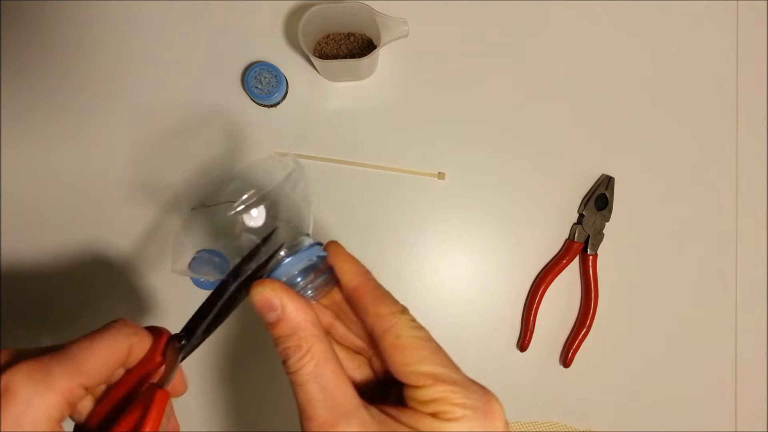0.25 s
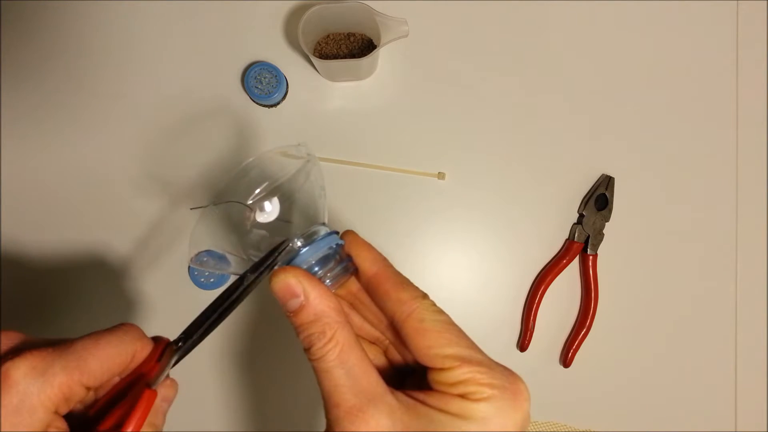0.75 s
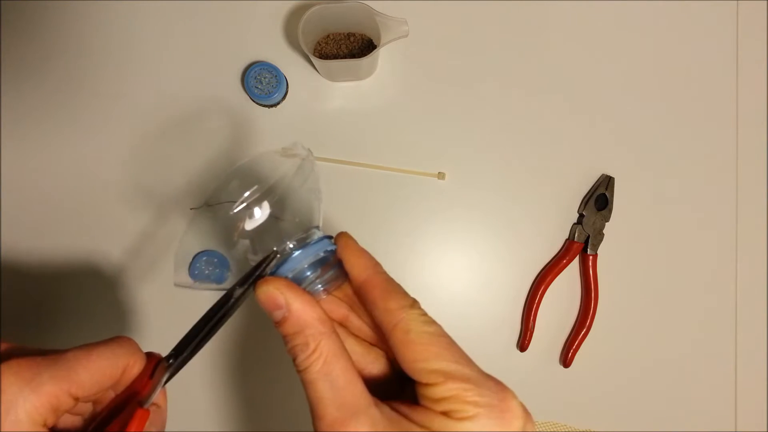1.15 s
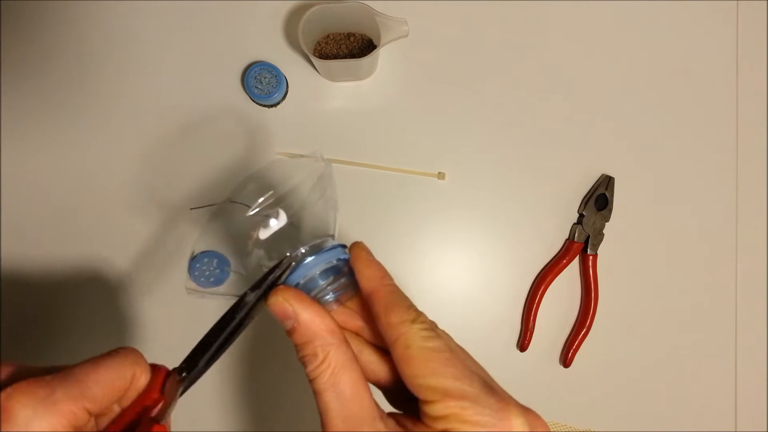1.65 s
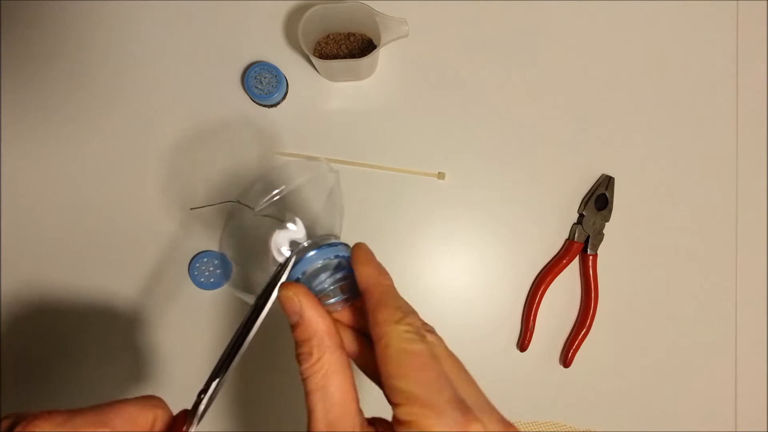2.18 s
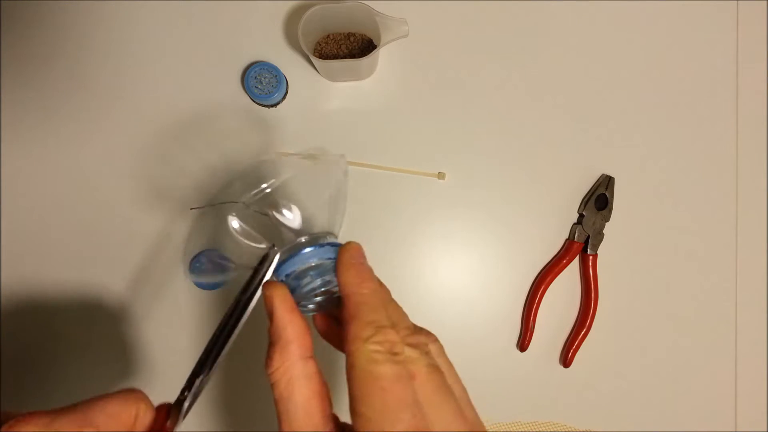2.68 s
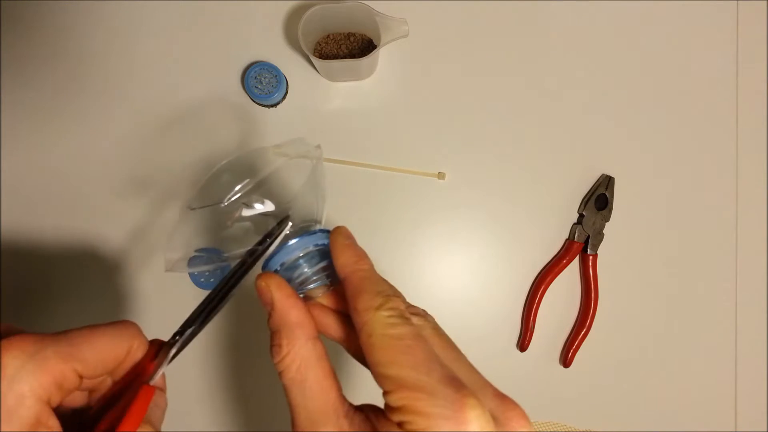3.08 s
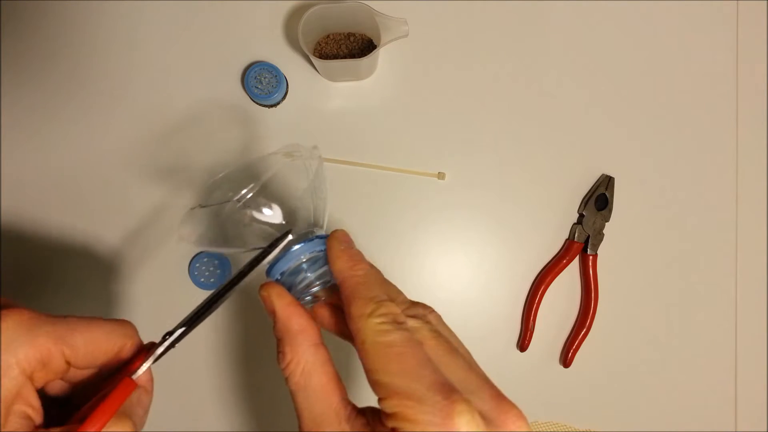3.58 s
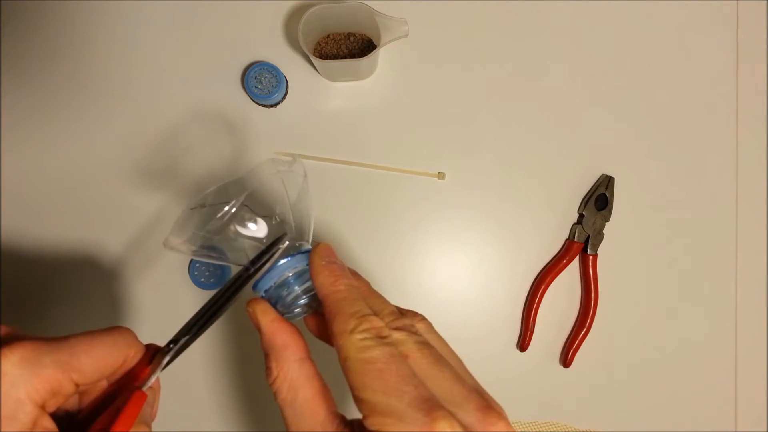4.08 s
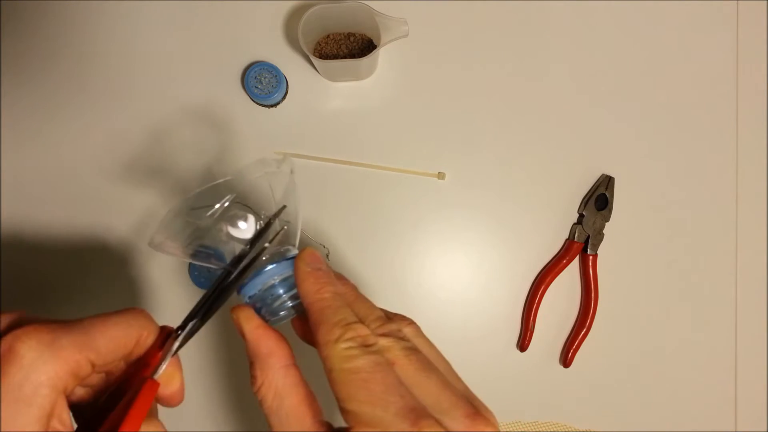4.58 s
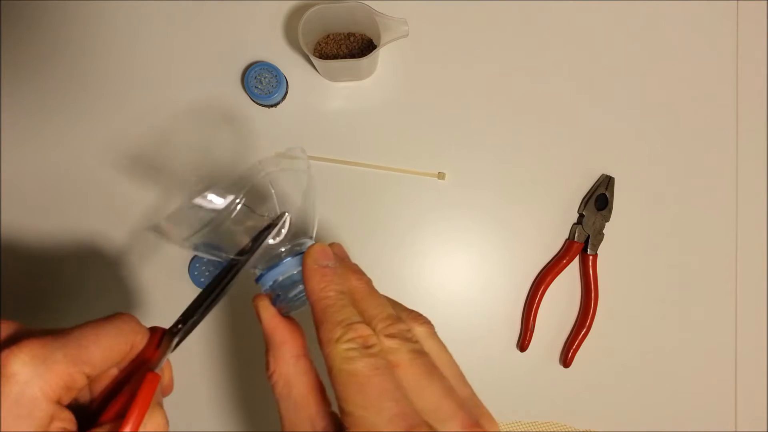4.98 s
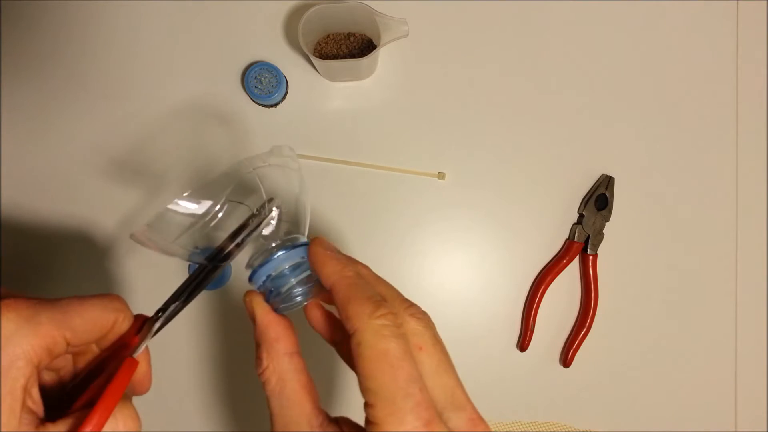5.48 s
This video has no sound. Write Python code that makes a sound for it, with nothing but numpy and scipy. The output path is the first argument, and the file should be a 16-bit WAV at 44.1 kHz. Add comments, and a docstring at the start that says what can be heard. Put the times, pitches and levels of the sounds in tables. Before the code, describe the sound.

Thin, stiff plastic snaps and crackles as blades shear it, picked up by a close stereo pair in a small reflective room. The cutting is uneven: scattered clicks, low hollow knocks from the bottle shell, brief dry rubs and gaps of near silence. The strongest crack comes just before three seconds; a busy burst follows at five, and a crisp snap ends it. Low room noise stays underneath.

```python
"""A small hard-walled room, where scissors cut a thin plastic bottle held over a table.
The wall buckles and cracks in short snaps; the blades shear and rub through it in dense crackle.
Snaps, crackle and a few dull knocks all drive the same set of ringing modes, the bottle's shell.
A pair of microphones above also hears the room's echoes, a distant rumble and a faint hiss."""
import sys
import numpy as np
from scipy import signal
from scipy.fft import rfft
from scipy.io import wavfile

SR = 44100
rng = np.random.default_rng(int(sys.argv[2]) if len(sys.argv) > 2 else 0)


def digitize_waveform(pressure):
    """Quantize a signal to 16-bit integers and store it at the path in sys.argv[1].

    Rows of a 2-D input are taken as channels; values are limited to [-1, 1].
    """
    field = np.atleast_2d(pressure).T
    bounded = np.clip(field, -1, 1)
    quanta = np.round(bounded * 32767).astype(np.int16)
    wavfile.write(sys.argv[1], SR, quanta)


N = 253263   # length of the scene in samples

# Levels in the tables are relative: they add up with each other and with the settings further down.
# Cracks of the wall: start_s, level_db (at the crest pitch), fall_db (loss per octave below the crest),
# treble_db (change towards the treble), pitch_hz (favoured mode), left_right_db (held within 5 either way),
# t60_s (time for the rattle to fade by 60 dB)
SNAPS = [(0.0617, -38, 6, -2.5, 2190, 2.5, 0.015), (0.2603, -26, 6, -16, 3520, -1, 0.02),
         (0.3, -40, 1, -7, 1080, 0, 0.0077), (0.3989, -42, 0.5, -23, 1570, 2, 0.0075),
         (0.4669, -51, 3, -17, 1030, 4, .01), (0.5876, -47.5, -0.5, -23, 3980, 0, 0.018),
         (0.6384, -60.5, 0, -10, 740, 4, .008), (0.7731, -32, 9.5, -21, 4410, -1, 0.015),
         (0.804, -41.5, 3, 0, 4900, 4, 0.034), (0.8112, -37, 5, -13, 3200, -2, 0.013),
         (0.8457, -16, 1.5, -13, 1038, -0.5, 0.026), (1.0065, -20.5, 7, -15, 2163, .5, 0.01),
         (1.202, -44, 12, -5, 4220, 6, 0.013), (1.2112, -37, 9, -4.5, 2740, 2, 0.032),
         (1.2184, -44.5, 7, -2, 2730, -1, 0.011), (1.2575, -43.5, 10, -11, 2760, 0, 0.015),
         (1.415, -39.5, 11, -5.5, 2810, 1, 0.026), (1.5421, -33.5, 15, -4, 5060, -1, 0.012),
         (1.5834, -32.5, 5.5, -12, 3940, 3, 0.023), (1.6159, -54, -0.5, -10, 4270, -6, .009),
         (1.7633, -52, 14, -8, 4320, 0, .009), (1.778, -55, 7, -7, 4960, 0, .009),
         (1.905, -57.5, 9, -23, 3260, 1, .009), (1.97, -54.5, 5, -21, 3590, 1, .009),
         (1.992, -56, 6, -7, 4970, 0, .009), (2.0616, -32, 2, -17, 1770, 1, 0.013),
         (2.0661, -29.5, 4.5, -14, 4520, 1.5, 0.017), (2.081, -37, 4, -8, 1780, 1, 0.013),
         (2.0976, -40, 5, 4, 5230, 1, 0.024), (2.1441, -49, 5, -1, 1890, 6, .011),
         (2.248, -46, 4.5, -3, 2800, 1, .01), (2.341, -43.5, 8, -4.5, 6950, -3, 0.011),
         (2.3487, -37.5, 7.5, -37, 3640, -8, 0.0076), (2.5591, -51, -2.5, -7, 3620, 7, 0.043),
         (2.6714, -30, 1, -8, 1840, 0, 0.023), (2.6835, -22.5, 1.5, -5.5, 713, 0, 0.016),
         (2.7665, -36.5, 2, -9.5, 2560, 4, .012), (2.8743, -3, 7.5, -3.5, 3890, -4.5, 0.028),
         (2.8775, -14, 3, -20, 2300, -2, .03), (3.1109, -30, 2.5, -13.5, 723, 0.5, 0.0082),
         (3.2662, -41.5, 4.5, -24.5, 3190, 2, .009), (3.427, -57.5, 12, -20, 4000, -0.5, .009),
         (3.4783, -34.5, 8, -24, 3320, 4, 0.0086), (4.0755, -48.5, 0, -17, 2110, -1, 0.0099),
         (4.0909, -25.5, 7, -9.5, 3770, -1, 0.016), (4.13, -25, 6, -3.5, 3930, 2.5, 0.016),
         (4.4165, -21.5, 7.5, -9.5, 4300, -1, 0.02), (4.4542, -40.5, 2.5, 2, 6360, 7, 0.022),
         (4.992, -18, 5.5, -28, 1030, -4, 0.007), (5.0213, -20, 5, -28, 735, -6, 0.022),
         (5.03, -19, 5.5, -2, 4200, 4, 0.0089), (5.0336, -21, 4.5, -4.5, 4500, -2, 0.021),
         (5.1781, -30.5, 2.5, 2, 3570, -3, 0.0067), (5.1815, -16.5, 11.5, 0.5, 4390, 0, 0.018),
         (5.2053, -19.5, 7, -40, 4070, -0.5, 0.018), (5.4166, -52, 1, -20.5, 930, -1, 0.021),
         (5.532, -49, 13, -20, 3830, -3, .01), (5.577, -42, 6, -20, 4400, 0, .008),
         (5.585, -37.5, 8, -25, 2160, -1, 0.0064), (5.6788, -10, 15, -12.5, 3383, -3, 0.015),
         (5.6797, -13, 14, -25, 4900, 0, .015)]
# Shearing and rubbing of the blades: start_s, bend_1_s, bend_2_s, end_s, level_db, fall_db (per octave),
# treble_db, pitch_hz. Sorted, the four times are the bends of the level: edge, full, full, edge.
# Whatever their order, the stroke sounds only from start_s to end_s.
STROKES = [(0.028, 0.039, 0.053, .062, -57, 1.5, -15, 2140),
           (0.167, 0.188, 0.26, .256, -57.5, -1, -14, 2100), (0.29, 0.299, .32, .34, -41, 2.5, -8, 2100),
           (0.311, 0.332, .4, .44, -38, 6, -16, 3490), (0.424, 0.457, 0.47, .54, -44, 0.5, -11, 2580),
           (0.834, 0.841, 0.87, .847, -36, 1.5, -8, 2680), (1.2, 1.204, 1.19, 1.255, -52, 13, -6, 2750),
           (1.545, 1.557, 1.582, 1.59, -48, 8, -12, 2750), (1.583, 1.59, 1.6, 1.63, -50, 4, -10, 3900),
           (1.94, 1.978, 2, 2.024, -55.5, 8, -17, 2910), (2.025, 2.061, 2.08, 2.061, -41.5, 7, -13, 2970),
           (2.318, 2.353, 2.33, 2.385, -40, 5.5, -6.5, 3520),
           (2.558, 2.566, 2.72, 2.67, -51.5, 2, -8.5, 2920), (2.782, 2.793, 2.86, 2.87, -39, 2, -6.5, 2350),
           (2.86, 2.869, 2.872, 2.875, -30, 4.5, -10, 2540),
           (3.06, 3.082, 3.108, 3.112, -37.5, 4, -11, 3130), (3.46, 3.465, 3.43, 3.48, -23, 6, -14.5, 2860),
           (3.685, 3.715, 3.755, 3.79, -36, 10, -14.5, 2850), (4.433, 4.46, 4.51, 4.54, -31, 4, -1, 3460),
           (4.677, 4.725, 4.53, 4.79, -50, 5.5, -22, 3020), (4.925, 4.962, 5.06, 4.984, -36, 5, -14, 4500),
           (4.978, 4.987, 5.04, 5.03, -29, 2, -2.5, 2100), (5.497, 5.538, 5.65, 5.57, -53, 8, -19.5, 3780),
           (5.567, 5.576, 5.5, 5.59, -47, 5, -20, 3800), (5.636, 5.673, 6.06, 5.677, -34, 7, -9, 3850)]
# Dull knocks that jolt the whole shell at once: start_s, level_db, pitch_hz (mode that answers most)
KNOCKS = [(0.2623, -7, 320), (.272, -12, 320), (.8465, 7, 437), (1.588, -20, 320), (2.563, -6, 320),
          (2.568, -8, 320), (2.6845, 4.5, 432), (3.1123, -8.5, 320), (3.4644, -12, 440), (4.5, -16, 440),
          (4.99, -8, 440), (5.001, 1, 764), (5.011, 2.5, 770), (5.023, 5, 765), (5.04, -10, 320),
          (5.2075, -6, 322), (5.216, -8, 320), (5.43, -18, 440)]
# Ringing modes of the bottle's shell, the last row the dry crack itself: pitch_hz, width_hz, level_db
SHELL = [(190, 37, -18), (319, 81, -3.5), (422, 92, -1.5), (751, 190, -1), (1016, 180, -2.5),
         (1480, 310, -3), (1786, 140, -5), (2100, 130, -4), (2417, 260, -4.5), (2753, 190, -3.5),
         (3307, 250, -9), (3630, 130, -8), (4010, 240, -9), (4620, 483, -2.5), (5140, 990, -5),
         (6460, 910, -2), (7090, 1310, -1.5), (8500, 1620, -0.5), (9980, 2200, -3.5), (12240, 7700, -9.5),
         (4200, 4000, -13.5)]
# Likeness of left and right in the near sound: pitch_hz, likeness (1 = the same, 0 = unrelated)
SPACING = [(300, .9), (1000, .75), (4000, 0.42), (12000, 0.083)]
# How long the room's echoes last: pitch_hz, t60_s
WALLS = [(200, 0.25), (500, 0.26), (1000, .6), (2000, 0.42), (4000, 0.41), (8000, 0.41), (13000, 0.23)]
# How strong the room's echoes are: pitch_hz, level_db
WETNESS = [(200, -4.5), (1000, -11), (3000, -11), (7000, -12.5), (13000, -7)]
# Colour of the background: pitch_hz, level_db (per Hz)
HUSH = [(15, -51), (25, -27.5), (65, -16.5), (179, -3), (290, -13), (331, -2.5), (579, -19), (756, -1),
        (841, -12), (1070, -15.5), (1770, -18.5), (5880, -26.5), (14600, -25.5)]
# Likeness of left and right in the background: pitch_hz, likeness
HUSH_LIKENESS = [(60, .25), (250, 0.44), (700, 0.19), (1500, 0.088), (14000, .05)]

CREST_HZ, BOTTOM_HZ, TREBLE_HZ = 4180, 350, 8840   # colour: straight slopes from the crest to these ends
BASS_HZ, BASS_FALL_DB = 800, 4   # below this pitch snaps and strokes lose this much more per octave
SNAP_RISE_S, SNAP_LIFT_DB = .0003, 29.0   # the lift is added to every snap
STROKE_EDGE_DB = -26.5   # level at the outer bends of a stroke against its full level
CLUMP_S = .004   # spacing of the random level steps within a stroke
KNOCK_FALL_DB, KNOCK_CYCLES = 25, 0.58   # loss per octave away from the knock's mode; length of the contact
EVENING = -.6   # share of a favoured mode's boost (in dB) added to what goes to the room: it takes some off
HUSH_DB = -54   # overall level of the background
CUTOFF_HZ, CEILING = 14900, .97   # upper limit of the recorder in pitch and in size


def bottle():
    """Every mode of the shell rings to strokes, snaps and knocks: left, right, and the sound sent all round."""
    bursts, slips = snap_bursts(click_db=15.5), crackle(per_s=6000, spread_db=4.0)
    clumps = rng.standard_normal((len(SHELL) + 1, len(np.arange(0, N / SR, CLUMP_S))))
    out = np.zeros((3, N))
    for k, (hz, width_hz, level_db) in enumerate(SHELL):
        clump_db = 0.38 * clumps[0] + 2.1 * clumps[k + 1]   # a little shared, mostly this mode's own
        drive = stroke_drive(slips, clump_db, hz)
        add_snaps(drive, bursts, hz, width_hz)
        add_knocks(drive, hz)
        out += (-1) ** k * from_db(level_db) * ring(drive, hz, width_hz)   # neighbours in opposite sign
    no_bass = signal.butter(2, 120, "high", fs=SR, output="sos")   # a small shell radiates no bass
    return signal.sosfilt(no_bass, out)


def snap_bursts(click_db):
    """A crack is a sharp step followed by a dying rattle of smaller slips; mid and side, energy 1."""
    t, rows = np.arange(1024) / SR, np.array(SNAPS)
    noise = rng.standard_normal((len(rows), 2, len(t)))
    noise[:, 0, 0] = noise[:, 1, 3] = from_db(click_db)   # the side gets the step 3 samples later
    rise = np.minimum((t + 0.00026) / SNAP_RISE_S, 1)
    fade_db = -60 * np.maximum(t - SNAP_RISE_S, 0) / np.maximum(rows[:, -1:], .004)
    bursts = noise * (rise * from_db(fade_db))[:, None]
    return bursts / np.sqrt(np.sum(bursts ** 2, axis=2, keepdims=True))


def add_snaps(drive, bursts, hz, width_hz):
    """Every crack hands this mode the energy that its level and colour ask for."""
    rows, alike = np.array(SNAPS), at_hz(SPACING, hz)
    spectra, bins = rfft(bursts), np.fft.rfftfreq(bursts.shape[2], 1 / SR)
    # how much of each burst this mode would pick up by chance, to be evened out
    peak = 1 / (1 + (2 * (bins - hz) / width_hz) ** 2)
    power = np.abs(pair(spectra[:, :1], spectra[:, 1:], alike)) ** 2 @ peak / peak.sum()
    even = pair(bursts[:, :1], bursts[:, 1:], alike) / np.sqrt(2 * power)[:, :, None]
    even *= from_db(np.clip(rows[:, 5, None, None], -5, 5) * [[.5], [-.5]])   # lean to left or right
    boost_db = favour(rows[:, 4], hz)
    strength = from_db(tint(*rows[:, 1:4].T, hz) + boost_db + SNAP_LIFT_DB)
    # the favoured mode beams at the microphones, the room gets less of it
    spread_out = strength * from_db(EVENING * boost_db)
    for start_s, burst, near, far in zip(rows[:, 0], even, strength, spread_out):
        i = round(start_s * SR)
        drive[:2, i:i + burst.shape[1]] += near * burst
        drive[2, i] += far   # a single click: over all directions the rattle's colour evens out


def crackle(per_s, spread_db):
    """Dense uneven slips of the blade in the plastic; mid and side, rms 1."""
    size_db = spread_db * np.minimum(rng.exponential(1, (2, N)), 5)
    sizes = from_db(size_db) * rng.choice([-1, 1], (2, N))
    happens = rng.random((2, N)) < per_s / SR
    return rms_one(sizes * happens)


def stroke_drive(slips, clump_db, hz):
    """Slips come in clumps of a few ms, swelling and fading with each stroke of the blades."""
    t, push, evened = np.arange(N) / SR, np.zeros(N), np.ones(N)
    clump_s = np.arange(0, N / SR, CLUMP_S)
    for *bends, full_db, fall_db, treble_db, pitch_hz in STROKES:
        i, j = round(bends[0] * SR), round(bends[-1] * SR)
        boost_db = favour(pitch_hz, hz)
        level_db = np.interp(t[i:j], np.sort(bends), [STROKE_EDGE_DB, 0, 0, STROKE_EDGE_DB])
        level_db += tint(full_db, fall_db, treble_db, hz) + boost_db
        level_db += np.interp(t[i:j], clump_s, clump_db)
        evened[i:j] = from_db(EVENING * boost_db)
        push[i:j] += signal.windows.tukey(j - i, .1) * from_db(level_db)
    near = pair(*slips, at_hz(SPACING, hz))
    return push * np.vstack([near, evened * slips[0]]) + 1e-18


def add_knocks(drive, hz):
    """A soft contact pushes one mode most, the others less the further away they lie in pitch."""
    for start_s, level_db, pitch_hz in KNOCKS:
        i, touch = round(start_s * SR), np.hanning(round(KNOCK_CYCLES * SR / pitch_hz))
        mode_db = level_db - KNOCK_FALL_DB * abs(np.log2(hz / pitch_hz))
        drive[:, i:i + len(touch)] += touch / touch.sum() * from_db(mode_db)


def ring(drive, hz, width_hz):
    """One mode of the shell: a resonance that rings at its pitch and dies faster the wider it is."""
    r = np.exp(-np.pi * width_hz / SR)   # what is left of the ringing after one sample
    b = np.sqrt((1 - r * r) / 2) * np.array([1, 0, -1])
    a = [1, -2 * r * np.cos(2 * np.pi * hz / SR), r * r]
    return signal.lfilter(b, a, drive)


def favour(pitch_hz, hz, boost_db=9.0, spread=0.051):
    """Where the wall is bent decides which mode rings out above its neighbours; the boost in dB."""
    return boost_db * np.exp(-(np.log(hz / pitch_hz) / spread) ** 2)


def tint(level_db, fall_db, treble_db, hz):
    """Colour of a snap or stroke: a slope below the crest, another towards the treble above it; in dB."""
    below = np.clip(np.log2(CREST_HZ / hz), 0, np.log2(CREST_HZ / BOTTOM_HZ))
    above = np.clip(np.log(hz / CREST_HZ) / np.log(TREBLE_HZ / CREST_HZ), 0, 1)
    bass = max(np.log2(BASS_HZ / hz), 0)
    return level_db - fall_db * below - BASS_FALL_DB * bass + treble_db * above


def room(x):
    """Diffuse echoes, largely different at each microphone, start after 3 ms and die at each band's own rate."""
    t = np.arange(SR) / SR
    tail, onset = 0, np.clip((t - .003) / 0.0011, 0, 1)
    for hz, noise in bands(rng.standard_normal((2, 2, len(t)))):
        dying = onset * from_db(-60 * t / at_hz(WALLS, hz))
        tail = tail + from_db(at_hz(WETNESS, hz)) * noise * dying / np.sqrt(np.sum(dying ** 2))
    tail = pair(tail[0], tail[1], 0.23) * np.sqrt(2)
    return signal.fftconvolve(x[None], tail, axes=1)[:, :N]


def hush():
    """Distant rumble of the house and microphone hiss: steady noise coloured band by band."""
    out = 0
    for hz, (mid, side) in bands(rng.standard_normal((2, 2, N))):
        out = out + from_db(at_hz(HUSH, hz)) * pair(mid, side, at_hz(HUSH_LIKENESS, hz))
    return from_db(HUSH_DB) * rms_one(out)


def bands(white):
    """Half-octave bands of noise with their centres; neighbours are unrelated."""
    edges = 25 * 2 ** np.arange(0, 9.6, .5)
    for k, (low, high) in enumerate(zip(edges, edges[1:])):
        band = signal.butter(2, [low, high], "band", fs=SR, output="sos")
        yield np.sqrt(low * high), signal.sosfilt(band, white[k % 2])


def pair(mid, side, alike):
    """Left and right of a given likeness from two unrelated signals."""
    alike = np.clip(alike, -1, 1)
    return np.sqrt((1 + alike) / 2) * mid + np.sqrt((1 - alike) / 2) * side * [[1], [-1]]


def at_hz(points, hz):
    """A table read at one pitch, with straight lines between its points on a log-frequency axis."""
    points = np.array(points)
    return np.interp(np.log(hz), np.log(points[:, 0]), points[:, 1])


def rms_one(x):
    """Scaled to rms 1."""
    return x / np.sqrt(np.mean(x ** 2) + 1e-20)


def from_db(db):
    """Gain of a level in dB."""
    return 10 ** (np.asarray(db) / 20)


def scene():
    """The bottle, its echoes and the quiet room."""
    left, right, all_round = bottle()
    return np.array([left, right]) + room(all_round) + hush()


def record(dry):
    """Loud peaks overload the converter, and what is cut off comes back as a low thump; the top is cut."""
    excess = np.abs(dry - np.clip(dry, -CEILING, CEILING))
    low_band = signal.butter(2, [150, 450], "band", fs=SR, output="sos")
    thump = signal.sosfilt(low_band, excess)
    top_cut = signal.cheby2(14, 30, CUTOFF_HZ, fs=SR, output="sos")
    return signal.sosfilt(top_cut, np.clip(dry + 0.42 * thump, -CEILING, CEILING))


dry = scene()
out = record(dry)
digitize_waveform(out)
```